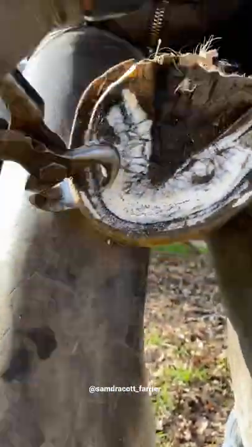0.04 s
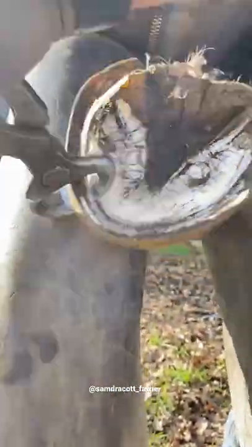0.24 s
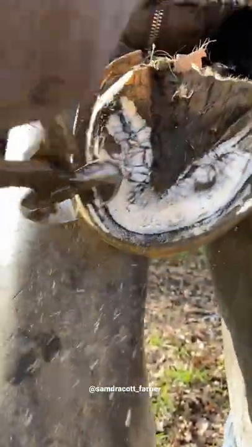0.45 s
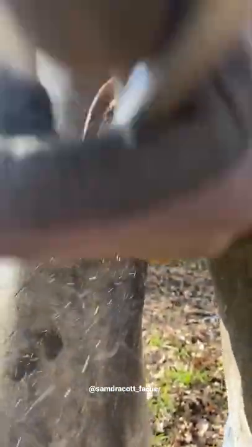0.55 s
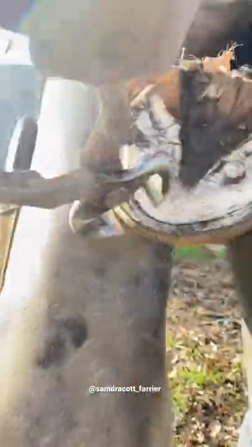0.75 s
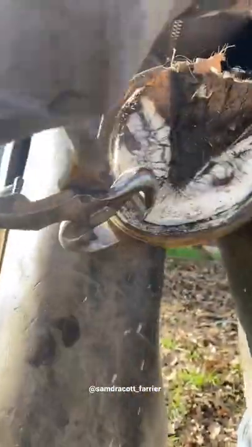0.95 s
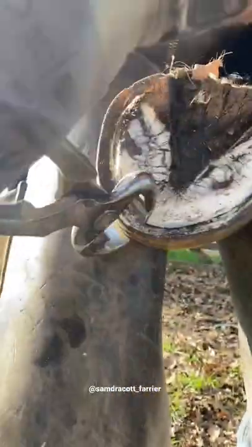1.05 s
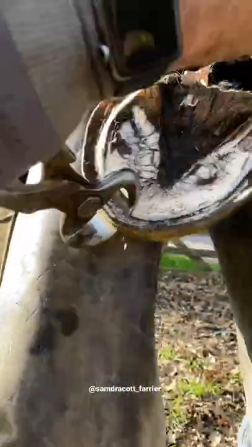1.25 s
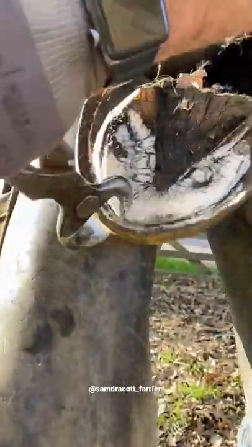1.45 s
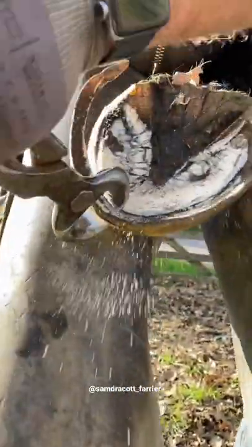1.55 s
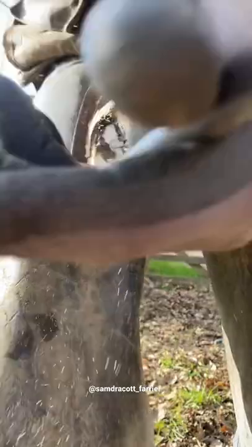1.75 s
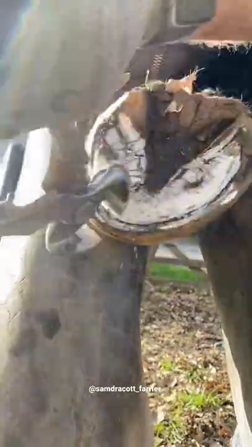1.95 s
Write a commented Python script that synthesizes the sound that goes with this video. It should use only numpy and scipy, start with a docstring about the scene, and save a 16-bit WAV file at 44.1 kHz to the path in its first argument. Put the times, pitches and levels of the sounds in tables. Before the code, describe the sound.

Hoof nippers cut horn, very close, outdoors. Faint creak and ticks from 0.16 s, then a loud, dry crack with short tear and dull thump at 0.22. Light taps and a low knock around 0.52-0.6, another tap at 0.72, soft bumps at 0.84-1.04, faint sleeve brush near 1.23. Second, brighter snap at 1.41; weak clicks and bumps at 1.67-1.78. Low uneven rumble, soft hiss, very little echo.

```python
"""Steel nippers bite through a hoof wall twice, close up and outdoors, over handling rumble and hiss.
A faint creak and clicks lead into the first cut: a swelling tear, a crack of coloured fracture
bursts, then the jaws slam shut with a pitch-dropping thump, a hoof knock and a faint ring of modes.
Taps, clicks and sagging sine bumps follow as the tool is set again, then a sleeve brushes past.
After the second cut come a faint second creak, clicks, bumps and a patter of sparse noise grains."""
import sys
import numpy as np
from scipy import signal
from scipy.fft import rfft, irfft, next_fast_len
from scipy.io import wavfile
from scipy.ndimage import uniform_filter1d, map_coordinates

SR = 44100
rng = np.random.default_rng(int(sys.argv[2]) if len(sys.argv) > 2 else 0)


def wav_record(signal):
    """Record a signal, one row per channel, as 16-bit PCM in the file named by sys.argv[1]."""
    frames = np.transpose(np.atleast_2d(signal))
    bounded = np.clip(frames, -1, 1)
    # unit amplitude maps onto the largest positive 16-bit level
    quanta = np.round(bounded * 32767).astype(np.int16)
    wavfile.write(sys.argv[1], SR, quanta)


N = 88200
T = np.arange(N) / SR

# moment of each cut: [s]
CUT_TIMES = [0.2160, 1.4087]
# each cut: (tear [dB], tear rise [s], tear tilt [dB/octave], crack [dB], crack hold [s],
#            jaws shut after [s], jaws [dB], thump before doubling [dB], thump start pitch [Hz],
#            thump settling [s], knock [dB], ring [dB])
CUTS = [(-16.5, .003, -1.5, -11, 0.0017, 0.0027, -18.5, -9, 712, 0.0028, -17.5, -45),
        (-18, 0.0031, 1.5, -9.5, 0.00071, 0.002, -14, -11, 635, 0.0046, -27.5, -53)]
# colour of each cut's crack: (frequency [Hz], level [dB])
CRACK_COLOURS = [
    [(300, -16.5), (800, 6.5), (1200, 4.5), (1600, 1.5), (2250, 9), (2900, -2), (4000, -2), (5100, 8.5),
     (5750, -6), (6400, 0.5), (7100, -6.5), (7600, -14.5), (8400, -2), (11200, 2), (12200, -5.5),
     (13300, -2.5), (14200, -18.5), (15500, -13), (16500, -48)],
    [(300, -30), (1000, -21.5), (1300, -4.5), (2200, 4.5), (2800, 1.5), (3800, -0.5), (4500, 0.5),
     (5300, 7.5), (5700, 9), (6400, 3.5), (7400, -17.5), (8100, -8), (9100, 10.5), (10000, 0), (10500, 8),
     (11900, 2.5), (12800, -9.5), (15500, -0.5), (16500, -24.5)],
]
# resonances that lift every crack's colour: (frequency [Hz], lift [dB])
HORN_RESONANCES = [(2200, 3.5), (2780, 4.5), (3140, 7.5), (4720, 5), (5570, 5.5), (8930, 5.5)]
# colour of the tearing fibres: (frequency [Hz], level [dB])
TEAR_COLOUR = [(200, -13.5), (1000, -4), (1700, -31), (2100, 12.5), (3050, 10), (4000, 5.5), (5300, 7.5),
               (6400, -12), (9000, -17.5), (14000, -30.5), (16500, -45.5)]
# hollow knock of the hoof: (frequency [Hz], level within the knock [dB], t60 [s])
HOOF_MODES = [(670, -4.5, 0.013), (1180, 3.5, .012)]
# ringing nippers: (frequency [Hz], level within the ring [dB], t60 [s])
STEEL_MODES = [(2087, -12, .09), (3470, -6.5, 0.17), (4640, -2, 0.11), (4900, -12, .13), (10220, -11, .16)]
# phase by which the left channel leads the right: (frequency [Hz], lead [rad])
LEFT_LEAD = [(1000, -0.27), (2500, 0.13), (6500, 1.46), (8500, 1.9), (11500, -1.5), (13000, -3)]
# firm taps of the jaws set on the wall: (time [s], level [dB], decay [s], colour [index])
TAPS = [(0.5211, -29.5, 0.0024, 0), (0.5608, -28, 0.0019, 1), (0.5666, -33, 0.002, 1),
        (0.7193, -28.5, 0.0014, 2)]
# colours of the tapped spots: (frequency [Hz], level [dB])
TAP_COLOURS = [
    [(300, -4), (700, -1.5), (1600, 0), (2200, -4), (3100, -0.5), (3600, -18), (4700, -11), (5400, -1.5),
     (6200, -9), (7100, -38), (9000, -15), (11000, -25), (16000, -34)],
    [(300, -3.5), (1000, 3), (1800, -2.5), (2500, 2.5), (4300, -3), (5400, 3), (7400, -10.5), (10000, 4),
     (12500, -6), (16000, -13)],
    [(400, -16), (1200, -5), (1750, -5), (2600, 2.5), (3200, -8.5), (3800, -2), (4500, -9.5), (5600, -0.5),
     (7000, -30), (9300, -14.5), (12000, -27), (16000, -40)],
]
# tool clicks and splinters:
# (time [s], level [dB], treble tilt [dB/octave], low edge [Hz], decay [s])
CLICKS = [(0.1575, -40.5, 4, 1500, 0.00084), (0.1881, -33.5, 2.5, 1500, 0.0022),
          (0.1994, -27.5, 0, 2200, 0.001), (0.5404, -41, -0.5, 4000, 0.0024),
          (0.6, -45.5, -1.5, 900, 0.011), (0.8355, -43.5, 2, 4000, 0.0024),
          (1.017, -39.5, -7, 1500, 0.0027), (1.6654, -38, -5, 1330, 0.0014),
          (1.6804, -44.5, 4.5, 3540, 0.0053)]
# shared colour of clicks and chips: (frequency [Hz], level [dB])
CLICK_COLOUR = [(150, -14), (700, 0.5), (1300, 1), (2900, 3.5), (4000, -4), (5500, 2.5), (7300, -21.5),
                (9500, -2.5), (12000, -9.5), (16000, -27.5)]
# patter of loose chips: (time [s], level [dB], swell and fade time constant [s])
CHIPS = [(1.779, -48, 0.01)]
# soft bumps of tool and arm on the leg:
# (time [s], level [dB], pitch [Hz], decay [s], left channel's lead [rad])
BUMPS = [(0.5609, -22, 836, 0.0025, -1.9), (0.5628, -13.5, 264, 0.0023, 1), (0.636, -31, 170, 0.0057, 0),
         (0.709, -34.5, 105, 0.032, 0), (0.8356, -21, 191.2, 0.013, -0.16),
         (0.8366, -20.5, 392, 0.0044, -0.38), (0.854, -23.5, 66.4, 0.012, 0.4),
         (0.979, -31.5, 286, 0.0063, -0.16), (1.038, -18.5, 172, 0.0028, -0.16),
         (1.255, -34, 66, 0.031, -0.3), (1.712, -34, 285, 0.012, 0.42), (1.727, -25, 148, 0.0072, 0.19),
         (1.77, -45, 668, 0.014, 0.5)]
# faint narrow-band creaks, one before the first cut, one after the second:
# (time [s], level [dB], pitch [Hz], swell and fade time constant [s])
CREAKS = [(0.158, -48, 2970, .006), (1.441, -55.5, 3490, 0.013)]
# sleeve brushing past: (time [s], level [dB], swell and fade time constant [s])
RUSTLES = [(1.228, -53.5, 0.019)]
# colour of the sleeve: (frequency [Hz], level [dB])
SLEEVE_COLOUR = [(800, -24), (5000, 18), (7000, -16)]
# low handling rumble: (time [s], level [dB])
RUMBLE_LEVEL = [(0, -45), (.12, -47.5), (.16, -55.5), (.21, -40), (.26, -59.5), (.34, -52), (.375, -41),
                (.44, -49), (.51, -48), (.58, -43.5), (.68, -46.5), (.73, -43), (.82, -40.5), (.88, -38),
                (.94, -50.5), (1.0, -39.5), (1.06, -39.5), (1.12, -44), (1.17, -56), (1.23, -36.5),
                (1.32, -51.5), (1.36, -56.5), (1.44, -54), (1.48, -78), (1.53, -52), (1.64, -62),
                (1.69, -38.5), (1.78, -50.5), (1.85, -48.5), (1.92, -57.5), (2, -56.5)]
# colour of the low rumble: (frequency [Hz], level [dB])
RUMBLE_COLOUR = [(20, -30), (33, -22), (60, 0.5), (110, -2), (170, -6), (260, -14), (380, -27), (650, -54),
                 (1500, -80)]
# stereo width of both rumble bands: (frequency [Hz], left-right likeness [0-1])
RUMBLE_ALIKE = [(60, 0.81), (130, 0.031), (300, 0), (700, 0)]
# low-mid handling rumble: (time [s], level [dB])
LOW_MID_LEVEL = [(0, -51), (.17, -52), (.30, -70), (.42, -54.5), (.60, -57), (.76, -64), (.89, -51),
                 (.94, -57), (1.04, -45), (1.12, -51.5), (1.17, -64), (1.225, -49), (1.31, -60.5),
                 (1.39, -51.5), (1.47, -71.5), (1.62, -66.5), (1.72, -54.5), (1.83, -55.5), (2, -60.5)]
# colour of the low-mid rumble: (frequency [Hz], level [dB])
LOW_MID_COLOUR = [(100, -18.5), (210, 3), (310, 2.5), (450, -2.5), (650, -11), (1200, -48)]
# short echo of the surroundings: (frequency [Hz], t60 [s])
YARD_DECAY = [(200, .1), (2500, 0.31), (6000, 0.2), (12000, 0.085)]
# background hiss: (time [s], middle level [dB], treble level [dB])
HISS_LEVEL = [(0, -50.5, -60.5), (.05, -55, -59), (0.109, -59.5, -69), (0.228, -50, -66),
              (0.304, -73.5, -84), (.36, -61.5, -60), (0.405, -50.5, -52.5), (.46, -57.5, -62.5),
              (.55, -58.5, -67.5), (.66, -57.5, -67.5), (.79, -59.5, -73), (1.02, -60.5, -68),
              (1.08, -58.5, -57.5), (1.18, -60.5, -65), (1.225, -53.5, -58), (1.27, -61.5, -63.5),
              (1.351, -55.5, -61), (1.432, -64, -81), (1.498, -73.5, -73.5), (1.566, -62.5, -56),
              (1.65, -57, -64.5), (1.711, -55.5, -66.5), (1.78, -59.5, -62.5), (1.83, -58, -70.5),
              (2, -61, -70)]
# colour of the middle hiss: (frequency [Hz], level [dB])
HISS_COLOUR = [(100, -2.5), (330, -3), (560, -6), (900, 0.5), (1400, -9.5), (2600, -9.5), (4200, -14),
               (5800, -17), (6800, -42), (9000, -48.5)]
# stereo width of middle hiss and sleeve: (frequency [Hz], left-right likeness [0-1])
HISS_ALIKE = [(300, 0.062), (700, 0.24), (1400, 0.055), (3500, 0.84), (7000, 0.035)]
# colour of the treble hiss: (frequency [Hz], level [dB])
FIZZ_COLOUR = [(4000, -10.5), (6000, 2.5), (7400, -29.5), (8600, -1), (11000, 3.5), (12200, -1),
               (13300, -25.5), (15500, -22), (16500, -44.5)]
# stereo width of the treble hiss: (frequency [Hz], left-right likeness [0-1])
FIZZ_ALIKE = [(6000, 0.16), (12000, 0.22)]

ATTACK_S, TILT_PIVOT_HZ = 0.000067, 3500  # shared by cracks, taps and clicks; by tears and clicks
SPLINTER_DB, SPLINTERS_PER_S = 2.5, 1800  # unevenness of the fractures within one burst
CRACK_FALL_S, JAWS_HOLD_S, JAWS_FALL_S, TEAR_FALL_S = 0.00019, 0.0011, 0.0016, 0.003
SPLIT_DB, SPLIT_S = -1, 0.00031  # first split: level over the crack, rise and decay
ECHO_S, ECHO_SHARE = 0.0013, 0.1  # the sole throws the crack back
HORN_HALF_WIDTH_HZ = 100
CUT_ALIKE, TEAR_ALIKE = 0.64, 0.36
CUT_PAN_DB, KNOCK_PAN_DB = -0.5, 4.5  # left over right
THUMP_END_HZ, THUMP_RISE_S, THUMP_FALL_S = 80, 0.0016, 0.0014
SWAY_DB, SWAY_FALL_S = -19, 0.01  # the leg sways on, relative to the thump
CHIPS_PER_S = 800
BUMP_RISE_S, BUMP_SAG_PER_S = 0.0012, 3.8
LUMPS_DB = 2.5  # unevenness of the handling
CREAK_HALF_WIDTH = .06  # share of the pitch
YARD_DB = -34.5
LOW_CUT_HZ, TOP_HZ = 31.3, 16900


def amp(db):
    """Decibels to gain."""
    return 10 ** (np.asarray(db) / 20)


def unit(x):
    """Scale to rms 1."""
    return x / np.sqrt(np.mean(x ** 2) + 1e-20)


def pan(db):
    """Left and right gains that differ by db, left louder when positive."""
    return amp([[db / 2], [-db / 2]])


def along(points, hz):
    """Read (Hz, value) points on a log frequency axis."""
    f, v = np.transpose(points)
    return np.interp(np.log(hz + 1), np.log(f + 1), v)


def level_over_time(points):
    """Gain along T from (s, dB) points."""
    return amp(np.interp(T, *np.transpose(points)))


def swell(s, db, width):
    """Gain that swells up to time s and fades at the same speed."""
    return amp(db) * np.exp(-np.abs(T - s) / width)


def tilted(hz, tilt):
    """Treble tilt in dB, flat below 800 Hz."""
    return tilt * np.log2(np.maximum(hz, 800) / TILT_PIVOT_HZ)


def filtered(x, response):
    """Shape x with a response of frequency."""
    m = next_fast_len(N + SR // 4)
    return irfft(rfft(x, m) * response(np.fft.rfftfreq(m, 1 / SR)), m)[..., :N]


def causal(db, size=1024):
    """Short causal impulse response of energy 1 for a colour db(Hz)."""
    cepstrum = irfft(np.log(amp(db(np.fft.rfftfreq(size, 1 / SR)))))
    # folding the cepstrum gives minimum phase
    cepstrum[1:size // 2] *= 2
    cepstrum[size // 2 + 1:] = 0
    h = irfft(np.exp(rfft(cepstrum)))
    return h / np.linalg.norm(h)


def evened(x, size=61):
    """Smooth out a swarm's broad chance peaks and dips, so that the body sets the colour."""
    z = rfft(x)
    power = np.abs(uniform_filter1d(np.mean(np.abs(z) ** 2, axis=0), size))
    return irfft(z / np.sqrt(power + power.mean() / 20))


def burst(s, rise, hold, fall, colour, alike, pan_db, size=4096):
    """A swarm of tiny fractures swells up to time s, holds and dies in a coloured body; stereo."""
    start = size // 4
    t = (np.arange(size) - start) / SR
    envelope = np.exp(np.minimum(t, 0) / rise - np.maximum(t - hold, 0) / fall)
    unevenness = np.interp((t - t[0]) * SPLINTERS_PER_S, np.arange(size), rng.standard_normal(size))
    splinters = amp(SPLINTER_DB * unevenness)
    mid, side = rng.choice([-1, 1], (2, size)) * envelope * splinters
    turn = np.arccos(np.clip(alike, -1, 1)) / 2
    pair = np.cos(turn) * mid + np.sin(turn) * side * np.array([[1], [-1]])
    pair = signal.fftconvolve(evened(pair), causal(colour)[None], axes=1)[:, :size]
    pair = unit(pair) * np.sqrt(np.mean(envelope ** 2)) * pan(pan_db)
    return np.pad(pair, ((0, 0), (round(s * SR), N)))[:, start:start + N]


def rush(spectrum, alike):
    """Coloured stereo noise of rms 1."""
    def mid_side(hz):
        turn = np.arccos(np.clip(along(alike, hz), -1, 1)) / 2
        return amp(along(spectrum, hz)) * [np.cos(turn), np.sin(turn)]
    mid, side = filtered(rng.standard_normal((2, N)), mid_side)
    return unit(np.array([mid + side, mid - side]))


def cuts():
    """Fibres tear, the wall splits and cracks, and the jaws meet with thump, knock and ring."""
    out = np.zeros((2, N))
    for s, row, points in zip(CUT_TIMES, CUTS, CRACK_COLOURS):
        (tear_db, rise, tilt, crack_db, hold, shut, jaws_db,
         thump_db, thump_hz, settling, knock_db, ring_db) = row
        out += crack(s, crack_db, hold, shut, jaws_db, points)
        out += amp(tear_db) * tear(s, rise, tilt)
        out += amp(thump_db) * thump(s + shut, thump_hz, settling)
        out += amp(knock_db) * pan(KNOCK_PAN_DB) * ring(s + shut, HOOF_MODES)
        out += amp(ring_db) * ring(s + shut, STEEL_MODES)
    return out


def crack(s, crack_db, hold, shut, jaws_db, points):
    """Bursts of crack, first split and shutting jaws excite the horn, and the sole echoes them."""
    def colour(hz):
        peaks = [db / (1 + ((hz - centre) / HORN_HALF_WIDTH_HZ) ** 2) for centre, db in HORN_RESONANCES]
        return along(points, hz) + sum(peaks)
    body = (colour, CUT_ALIKE, CUT_PAN_DB)
    out = amp(crack_db) * burst(s, ATTACK_S, hold, CRACK_FALL_S, *body)
    out += amp(crack_db + SPLIT_DB) * burst(s, SPLIT_S, 0, SPLIT_S, *body)
    out += amp(jaws_db) * burst(s + shut, ATTACK_S, JAWS_HOLD_S, JAWS_FALL_S, *body)
    return filtered(out, lambda hz: 1 + ECHO_SHARE * np.exp(-2j * np.pi * hz * ECHO_S))


def tear(s, rise, tilt):
    """Breaking fibres swell into the cut and die away, well to the left."""
    fibres = lambda hz: along(TEAR_COLOUR, hz) + tilted(hz, tilt)
    return burst(s, rise, 0, TEAR_FALL_S, fibres, TEAR_ALIKE, pan_db=7)


def thump(s, start_hz, settling):
    """The released hoof jolts: a push whose pitch drops into a slow sway."""
    t = np.maximum(T - s, 0)
    drop_cycles = (start_hz - THUMP_END_HZ) * settling * (1 - np.exp(-t / settling))
    cycles = THUMP_END_HZ * t + drop_cycles
    fade = np.exp(-t / THUMP_FALL_S) + amp(SWAY_DB) * np.exp(-t / SWAY_FALL_S)
    envelope = (1 - np.exp(-t / THUMP_RISE_S)) * fade
    return 2 * envelope * np.sin(2 * np.pi * cycles)


def ring(s, modes):
    """Modes struck at time s, each dying at its own speed."""
    t = np.maximum(T - s, 0)
    return sum(amp(db - 60 * t / t60) * np.sin(2 * np.pi * hz * t) for hz, db, t60 in modes)


def taps():
    """The open jaws are set on the wall; each spot answers with its own colour."""
    out = np.zeros((2, N))
    for s, db, fall, spot in TAPS:
        colour = lambda hz: along(TAP_COLOURS[round(spot)], hz)
        out += amp(db) * burst(s, ATTACK_S, 0, fall, colour, alike=0.82, pan_db=0.5)
    return out


def clicks():
    """The jaws touch the horn and small splinters give way in short, tilted bursts."""
    out = np.zeros((2, N))
    for s, db, tilt, edge_hz, fall in CLICKS:
        def colour(hz):
            low_edge_loss = 10 * np.log10(1 + (edge_hz / (hz + 200)) ** 4)
            return along(CLICK_COLOUR, hz) + tilted(hz, tilt) - low_edge_loss
        out += amp(db) * burst(s, ATTACK_S, 0, fall, colour, alike=0.61, pan_db=0.5)
    return out


def chips():
    """Loose grains of horn patter down: sparse random impulses through the click colour."""
    grains = rng.standard_normal((2, N)) * (rng.random(N) < CHIPS_PER_S / SR)
    body = causal(lambda hz: along(CLICK_COLOUR, hz))
    patter = unit(signal.fftconvolve(grains, body[None], axes=1)[:, :N])
    return patter * sum(swell(*row) for row in CHIPS)


def bumps():
    """Dull, quickly damped sine knocks that sag slightly in pitch."""
    out = np.zeros((2, N))
    for s, db, hz, fall, lead in BUMPS:
        t = np.maximum(T - s, 0)
        cycles = hz * (1 - np.exp(-BUMP_SAG_PER_S * t)) / BUMP_SAG_PER_S
        envelope = (1 - np.exp(-t / BUMP_RISE_S)) * np.exp(-t / fall)
        out += amp(db) * envelope * np.sin(2 * np.pi * cycles + [[lead / 2], [-lead / 2]])
    return out


def rubbing():
    """Faint creaks as narrow noise, and a sleeve's brush as broad noise."""
    def narrow(centre):
        resonance = lambda hz: 1 / (1 + ((hz / centre - 1) / CREAK_HALF_WIDTH) ** 2)
        return unit(filtered(rng.standard_normal(N), resonance))
    creaks = sum(swell(s, db, width) * narrow(hz) for s, db, hz, width in CREAKS)
    brush = sum(swell(*row) for row in RUSTLES) * rush(SLEEVE_COLOUR, HISS_ALIKE)
    return creaks + brush


def handling(count=60):
    """Handling rumble as a low and a low-mid noise band that share one lumpy unevenness."""
    lumps = map_coordinates(rng.standard_normal(count + 1), [np.linspace(0, count, N)])
    lumps = amp(LUMPS_DB * lumps)
    low = level_over_time(RUMBLE_LEVEL) * unit(lumps * rush(RUMBLE_COLOUR, RUMBLE_ALIKE))
    low_mid = level_over_time(LOW_MID_LEVEL) * unit(lumps * rush(LOW_MID_COLOUR, RUMBLE_ALIKE))
    return low + low_mid


def yard(x):
    """A short echo from ground and walls: noise that decays at its own speed in each band."""
    hz, t, z = signal.stft(rng.standard_normal((2, SR // 3)), SR, nperseg=256)
    decay = amp(-60 * t / along(YARD_DECAY, hz)[:, None])
    tail = signal.istft(z * decay, SR, nperseg=256)[1]
    return signal.fftconvolve(x, tail / np.linalg.norm(tail[0]), axes=1)[:, :N]


def hiss():
    """Outdoor air and sleeve rustle as two noise bands; the level dips briefly after each cut."""
    s, middle_db, treble_db = np.transpose(HISS_LEVEL)
    middle = amp(np.interp(T, s, middle_db)) * rush(HISS_COLOUR, HISS_ALIKE)
    treble = amp(np.interp(T, s, treble_db)) * rush(FIZZ_COLOUR, FIZZ_ALIKE)
    return middle + treble


def scene():
    """Nippers with a phase lead between the channels and an echo, over handling noise and hiss."""
    lead = lambda hz: np.exp(.5j * along(LEFT_LEAD, hz) * np.array([[1], [-1]]))
    tool = filtered(cuts() + taps() + clicks(), lead)
    echo = amp(YARD_DB) * yard(tool)
    return tool + echo + chips() + bumps() + rubbing() + handling() + hiss()


def record(dry):
    """Shed the deepest bass, round the highest peaks and keep almost nothing above the band limit."""
    low_cut = lambda hz: (1j * hz) ** 2 / (LOW_CUT_HZ ** 2 - hz ** 2 + 1j * hz * LOW_CUT_HZ)
    x = filtered(dry, low_cut)
    x = x / (1 + np.abs(x / .85) ** 6) ** (1 / 6)  # peaks stay below .85 here
    return filtered(x, lambda hz: 1 / (1 + (hz / TOP_HZ) ** 200))


dry = scene()
out = record(dry)
wav_record(out)
```